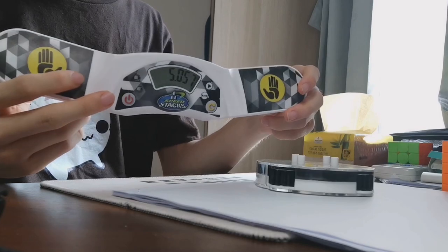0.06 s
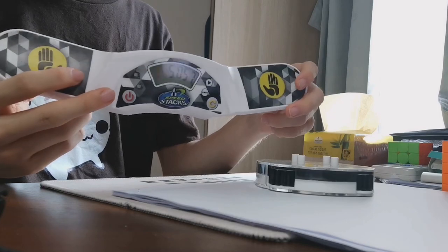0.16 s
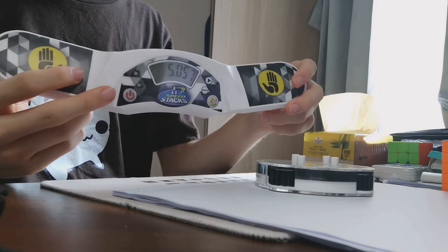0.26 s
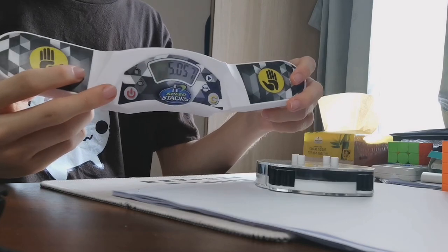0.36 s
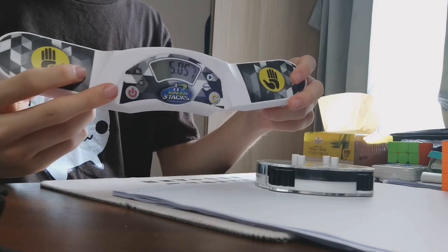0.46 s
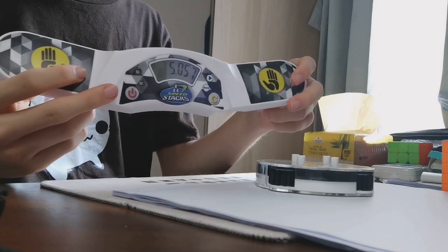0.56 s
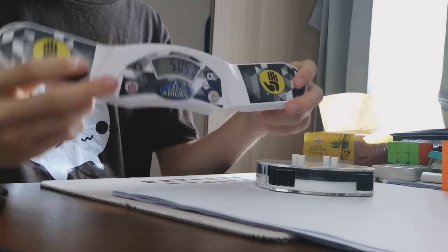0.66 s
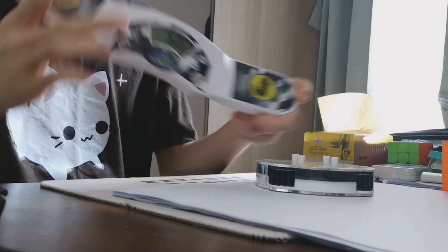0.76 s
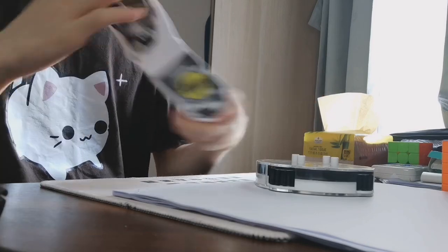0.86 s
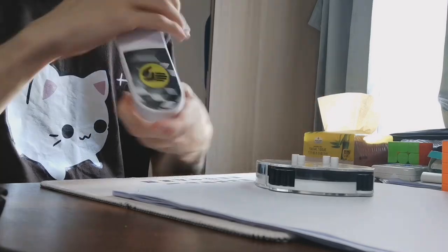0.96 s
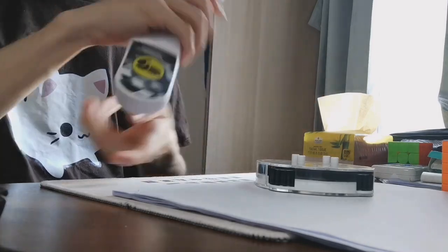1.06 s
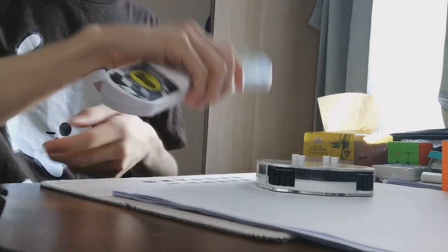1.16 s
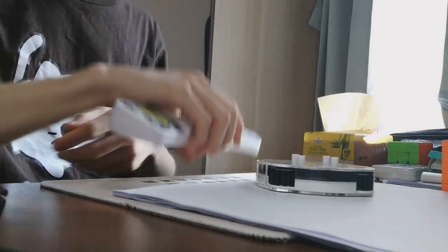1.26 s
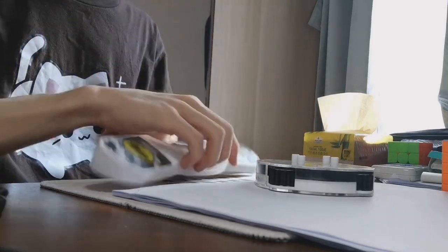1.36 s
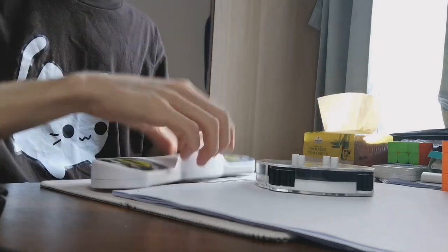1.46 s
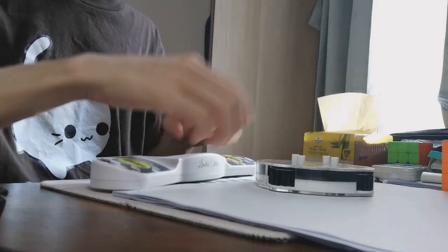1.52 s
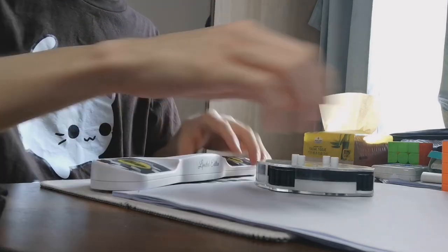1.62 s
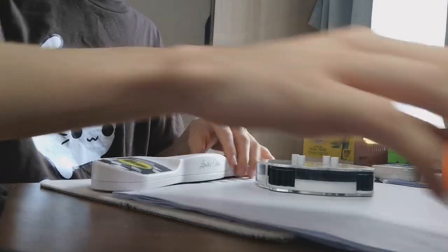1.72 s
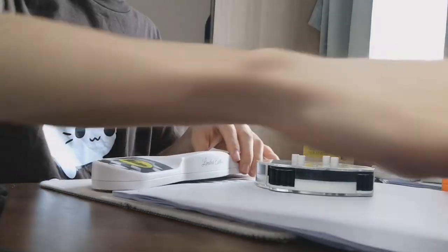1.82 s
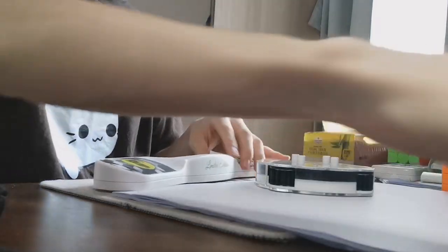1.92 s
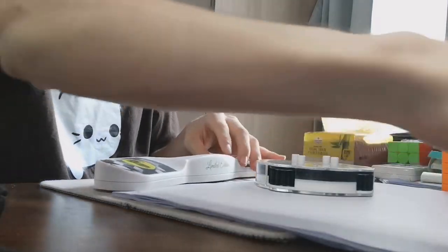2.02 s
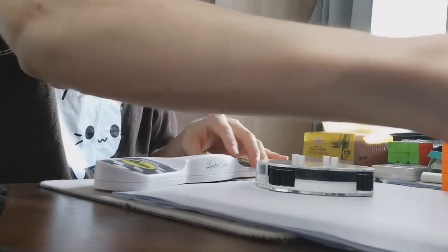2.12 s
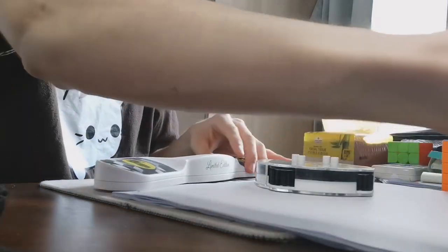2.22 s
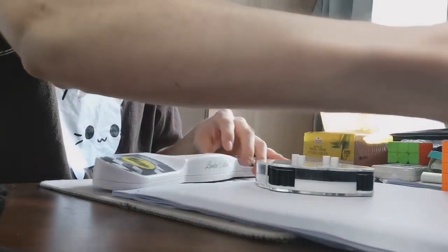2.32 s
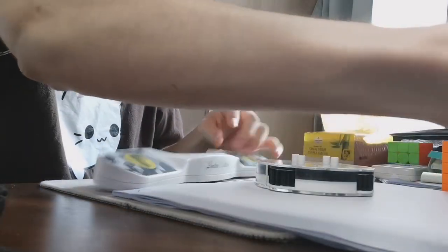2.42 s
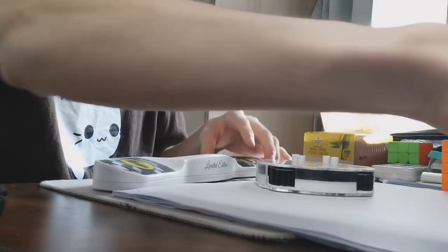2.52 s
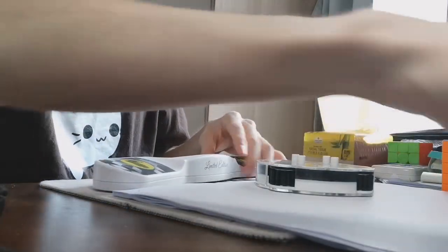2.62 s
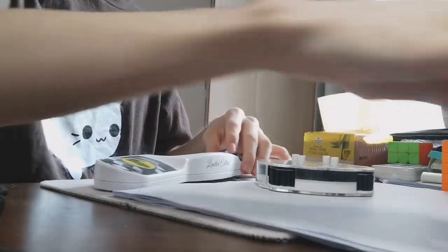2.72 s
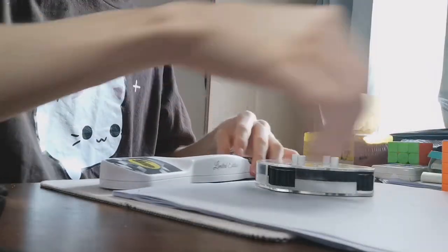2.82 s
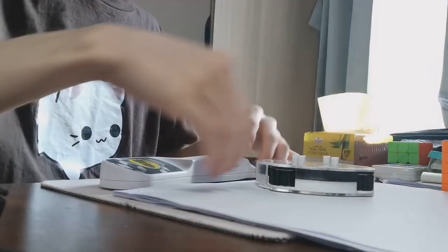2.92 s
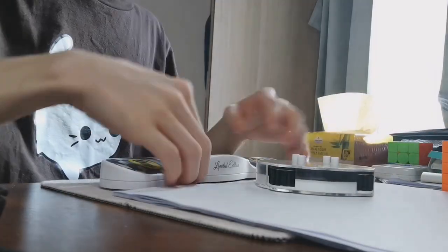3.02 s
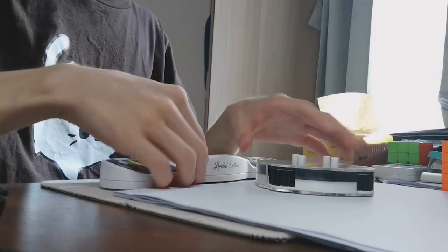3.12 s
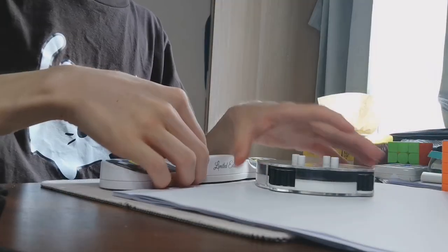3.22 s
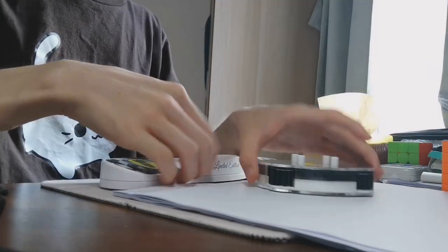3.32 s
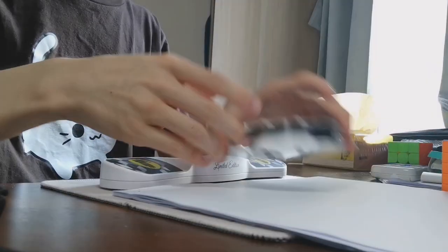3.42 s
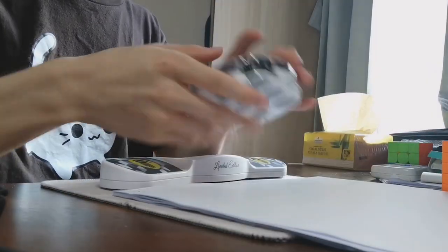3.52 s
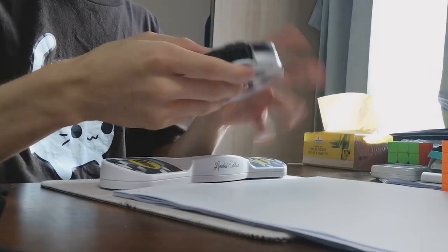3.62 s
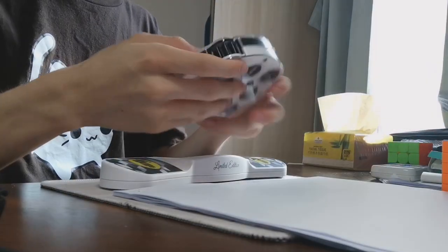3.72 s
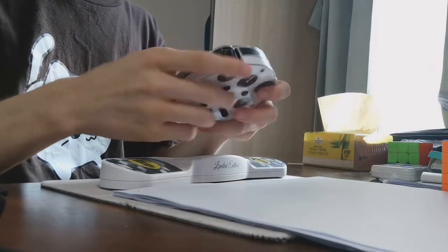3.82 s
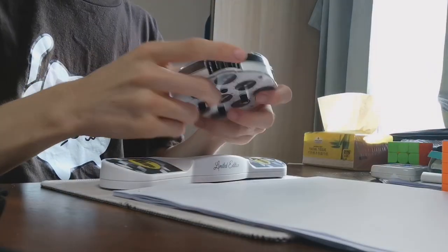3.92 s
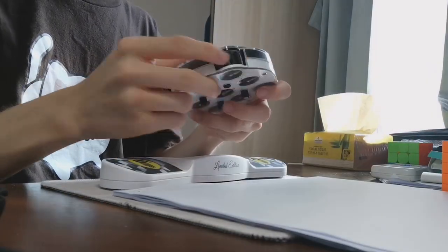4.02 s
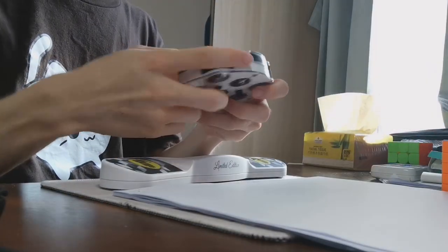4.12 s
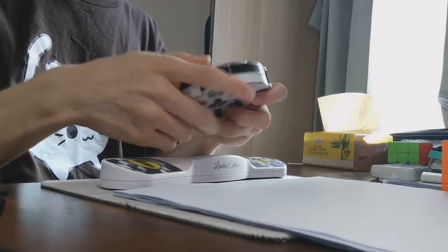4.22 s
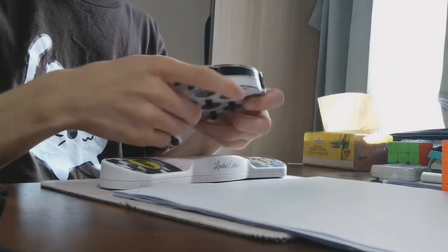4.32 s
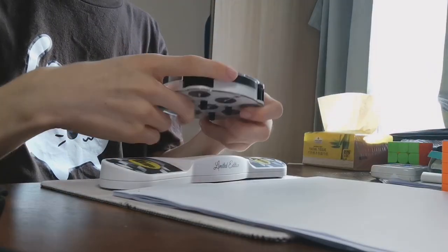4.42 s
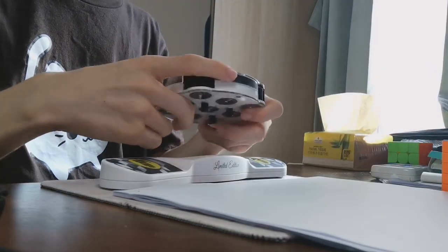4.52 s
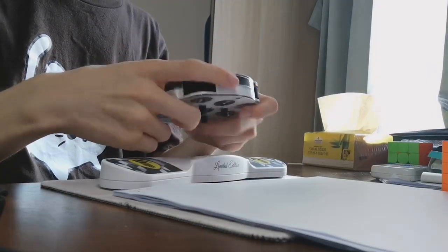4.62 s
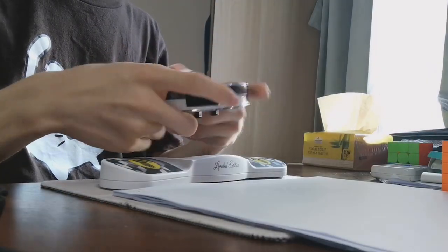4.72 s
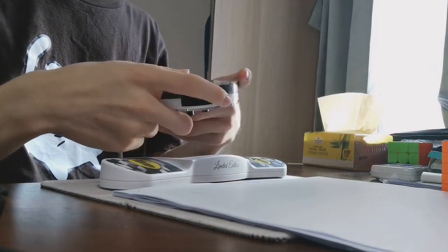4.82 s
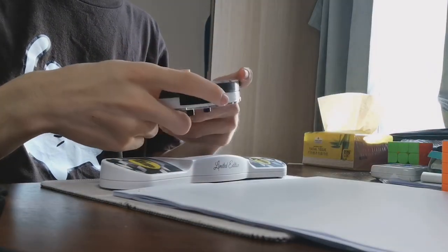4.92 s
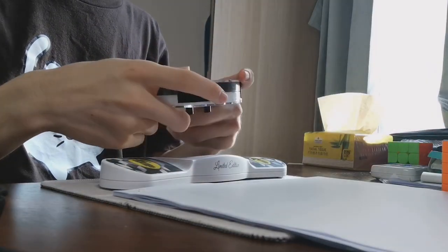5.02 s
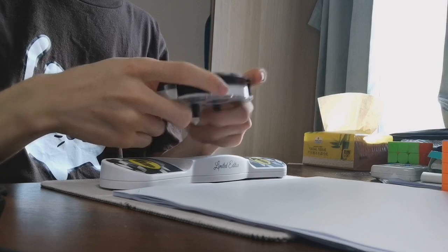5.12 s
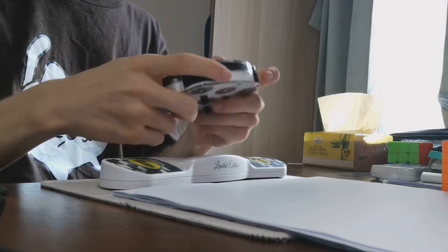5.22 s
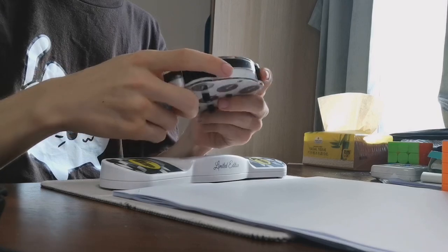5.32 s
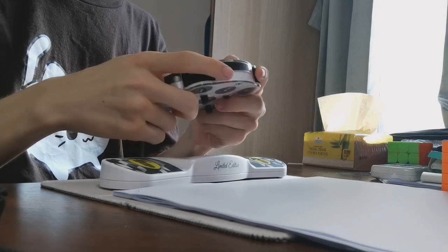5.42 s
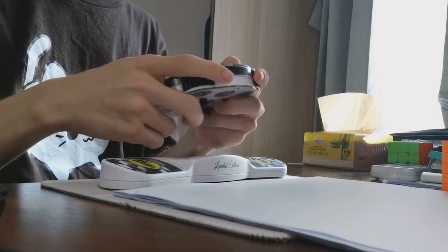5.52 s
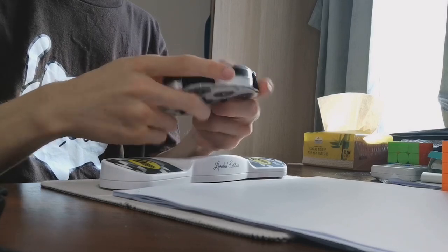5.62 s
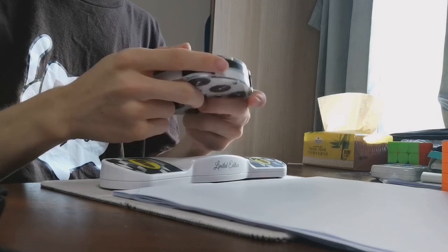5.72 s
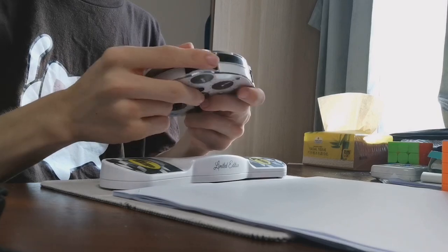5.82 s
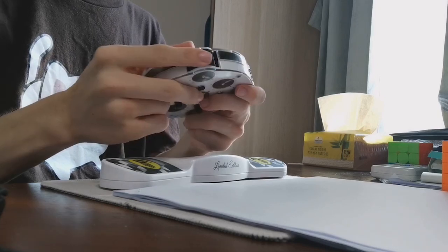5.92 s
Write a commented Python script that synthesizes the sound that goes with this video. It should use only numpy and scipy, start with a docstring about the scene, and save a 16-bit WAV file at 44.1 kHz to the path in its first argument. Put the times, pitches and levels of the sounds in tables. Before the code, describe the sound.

In a quiet small room, a plastic timer clatters onto a wooden desk, a knock thumps nearby, then a twisting puzzle clicks and ratchets rapidly.

```python
"""Low air hum of a small room and a faint whine are heard first and last throughout; skin and sleeve brush past.
A plastic timer is laid on a wooden desk, and a hand knocks on something beside the microphone.
Then a round pin-and-dial puzzle is lifted and worked fast: pins snap, dials ratchet and scrape.
Contacts are swarms of tiny collisions filtered by the body struck, the desk is decaying sines, the air is
shaped noise; a two-port microphone hears them, the snaps, clacks and dials with short room echoes."""
import sys
import numpy as np
from scipy import signal
from scipy.fft import rfft, irfft, next_fast_len
from scipy.io import wavfile
from scipy.ndimage import uniform_filter1d

SR = 44100
rng = np.random.default_rng(int(sys.argv[2]) if len(sys.argv) > 2 else 0)


def wrap_up_sound(samples):
    """Save the sound to the file named by the first command line argument, as 16-bit audio."""
    columns = np.atleast_2d(samples).T
    # keep every value between -1 and 1, then stretch to whole-number steps
    tamed = np.clip(columns, -1, 1)
    steps = np.round(tamed * 32767).astype(np.int16)
    wavfile.write(sys.argv[1], SR, steps)


N = 262836  # length in samples


def gain_of(db):
    """Decibels to a gain."""
    return 10 ** (np.asarray(db) / 20)


def evened(x):
    """Scales to an rms of 1."""
    return x / np.sqrt(np.mean(x ** 2) + 1e-20)


def read(points, hz):
    """Reads a (f/Hz, value) table on a log-frequency axis."""
    f, value = np.transpose(points)
    return np.interp(np.log(hz + 1), np.log(f + 1), value)


def add(mix, s, sound, pan_db):
    """Mixes a sound into both channels at s seconds, pan_db louder on the left."""
    part = mix[:, round(s * SR):][:, :sound.shape[-1]]
    part += gain_of([[pan_db / 2], [-pan_db / 2]]) * sound[..., :part.shape[1]]


def colour(x, db_at):
    """Causal minimum-phase filter with the gain curve db_at(Hz)."""
    gain = gain_of(db_at(abs(np.fft.fftfreq(4096, 1 / SR))))
    log_gain = np.log(np.maximum(gain, 1e-5))
    spectrum = np.exp(np.conj(signal.hilbert(log_gain)))
    taps = np.fft.ifft(spectrum).real[:2048]
    return signal.oaconvolve(x, taps[None], axes=1)[:, :x.shape[1]]


def modes_db(modes, hz):
    """Summed power, in dB, of (f/Hz, width/Hz, level/dB) resonances."""
    return 10 * np.log10(sum(gain_of(2 * db) / (1 + (2 * (hz - f) / w) ** 2) for f, w, db in modes))


def impacts(size, per_s, spread_db):
    """Tiny collisions of uneven strength and random sign at random moments."""
    chance, strength, sign = rng.random((size, 3)).T
    excess = np.minimum(-np.log(1 - strength), 3.5)  # mostly weak, a few strong
    return (chance < per_s / SR) * gain_of(spread_db * excess) * np.sign(sign - .5)


def pair(size, per_s, spread_db, unlike):
    """Collisions as the two ports hear them: the body radiates a little differently to each."""
    a, b = impacts(size, per_s, spread_db), impacts(size, per_s, spread_db)
    return evened(np.array([a + unlike * b, a - unlike * b]))


STROKE_RANGE_DB = 20  # a stroke changes by this much over its swell or fade time


def level(strokes):
    """Gain over time: each stroke swells to its peak and fades, both straight in dB."""
    t = np.arange(N) / SR
    gain = sum(gain_of(db - STROKE_RANGE_DB * np.maximum((s - t) / swell, (t - s) / fade))
               for s, db, swell, fade in strokes)
    return uniform_filter1d(gain, size=300)


# spectrum of the room air: f/Hz, relative level per Hz/dB
AIR_SPECTRUM = [(150, -14.5), (250, -8), (304, -33), (340, -25), (375, -7.5), (571, -2), (816, -7.5),
                (959, -5.5), (1990, -25.5), (2700, -22.5), (2840, -24.5), (3800, -33.5), (6000, -31.5),
                (6700, -22.5), (7500, -32.5), (8680, -53), (12000, -43), (15600, -87), (22000, -120)]
# low resonances of the room: f/Hz, width/Hz, relative total level/dB
ROOM_RESONANCES = [(54.4, 9.5, -56.5), (116, 8.6, -58.5), (165.7, 8.2, -58), (209.1, 7.6, -60.5)]
# how alike the air noise is at both ports: f/Hz, likeness/0 to 1
AIR_LIKENESS = [(60, 0.9), (180, 0.78), (550, 0.77), (1650, 0.011), (4970, 0.16), (15000, 0.33)]
# phase by which the left port leads in the air noise: f/Hz, lead/rad
AIR_PHASE_LEAD = [(0, 3), (1210, -1.5), (2670, 0.5), (6370, -18), (6800, -35.5), (16000, -7)]
# balance of the air noise: f/Hz, left-right/dB
AIR_BALANCE = [(60, -1), (180, 1.5), (550, 2), (1650, 1), (4970, 2), (15000, 3)]
AIR_DB, HUM_DB = -64.5, -50.5  # rms levels of the wide noise and of the resonances


def air():
    """Steady room noise, heaped up on the room's low resonances, only partly alike at the two ports."""
    frame, hop = 4096, 1024
    hz = np.fft.rfftfreq(frame, 1 / SR)
    a, b, c, d = rng.standard_normal((N // hop + 5, len(hz), 4)).T
    same = read(AIR_LIKENESS, hz)[:, None]
    left = a + 1j * b
    right = same * left + np.sqrt(1 - same ** 2) * (c + 1j * d)
    right = right * np.exp(-1j * read(AIR_PHASE_LEAD, hz))[:, None]
    side_db = read(AIR_BALANCE, hz)[:, None] / 2
    noise = np.array([left * gain_of(side_db), right * gain_of(-side_db)])

    def shaped(db):
        sound = signal.istft(noise * gain_of(db)[:, None], nperseg=frame, noverlap=frame - hop)[1]
        return evened(sound[:, :N])
    # a wider resonance spreads its power thinner
    resonances = [(f, w, db - 10 * np.log10(w)) for f, w, db in ROOM_RESONANCES]
    wide, hum = shaped(read(AIR_SPECTRUM, hz)), shaped(modes_db(resonances, hz))
    return gain_of(AIR_DB) * wide + gain_of(HUM_DB) * hum


WHINE_HZ, WHINE_DB = 2607, -82  # mean pitch and level


def whine():
    """A faint steady sine that wavers a little in pitch and level, stronger on the left."""
    pitch_drift, level_drift = evened(uniform_filter1d(rng.standard_normal((2, N)), size=3000))
    tone = np.sin(2 * np.pi * np.cumsum(WHINE_HZ + 7.7 * pitch_drift) / SR)
    return gain_of(WHINE_DB + 0.5 * level_drift) * np.sqrt(2) * tone * np.array([[1.2], [.8]])


# skin and sleeve brushing past: t/s, peak level/dB, swell/s, fade/s
RUSTLE_STROKES = [(.718, -74, .02, .015), (.92, -77.5, .15, .05), (1.078, -69.5, .17, 0.29),
                  (1.5, -71.5, 0.05, 0.068), (1.876, -70.5, 0.024, 0.17), (1.968, -64, 0.0089, 0.23),
                  (2.414, -81, 0.14, 0.11), (2.55, -65, 0.096, 0.11), (3.05, -76.5, 0.73, .15),
                  (3.204, -68.5, 0.037, 0.15)]
# colour of the friction: f/Hz, relative level per Hz/dB
FRICTION_SPECTRUM = [(880, -43), (1500, -7), (1640, -9.5), (2700, 0.5), (3470, -3), (8790, -10.5),
                     (10700, -10.5), (13000, -24), (16300, -45)]


def rustle():
    """Fine crackly friction: dense, very uneven collisions that swell and fade with each stroke."""
    crackle = pair(N, 9000, 3.4, 0.49)
    return evened(colour(crackle, lambda hz: read(FRICTION_SPECTRUM, hz))) * level(RUSTLE_STROKES)


RATTLE_PER_BUILD_UP = 0.73  # a slower blow also rattles longer
STRIKE_FADES_MS = 3  # the main strike is less distinct the longer the build-up, on this scale


def rattles(rows, body_db, usual_share_db, per_s, rattle_ms):
    """Each blow is a swarm of collisions that builds up, peaks, and dies after the rattle time.
    Returns the direct sound and the smoother average over all directions that reaches the walls."""
    out, away = np.zeros((2, N)), np.zeros((2, N))
    t = np.arange(4096) * 1000 / SR  # ms
    spots = 2 * np.pi * rng.random((len(rows), 2))
    for (s, db, share_db, ring_hz, rise_ms, pan_db), spot in zip(rows, spots):
        def mean_db(hz):
            tilt = 0.45 * (share_db - usual_share_db)  # dB per octave
            return body_db(hz) + tilt * np.log2(np.maximum(hz, 800) / 3000)

        def blow_db(hz):
            octave = np.log2(hz + 1)
            # every spot struck favours other modes
            where = sum(1.8 * np.cos(k * octave + phase) for k, phase in zip((4., 11.), spot))
            ring = 8.9 / (1 + ((hz - ring_hz) / (0.06 * ring_hz)) ** 2)
            return mean_db(hz) + where + ring

        decay_ms = rattle_ms + RATTLE_PER_BUILD_UP * rise_ms
        after = np.maximum(t - rise_ms, 0)
        shape = np.minimum(t / rise_ms, 1) ** 1.1 * np.exp(-(after / decay_ms) ** 1.01)
        # the main strike stands out of the swarm
        shape *= 1 + 0.68 * np.exp(-rise_ms / STRIKE_FADES_MS - abs(t - rise_ms) / 0.13)
        sound = colour(pair(len(t), per_s, 1.66, 0.44) * shape, blow_db)
        loudest = np.sqrt(uniform_filter1d(sound.mean(0) ** 2, size=130).max())  # over 3 ms
        sound *= gain_of(db) / loudest
        add(out, s, sound, pan_db)

        click = signal.unit_impulse((1, len(t)))
        pulse = colour(click, lambda hz: .6 * mean_db(hz) + .4 * blow_db(hz))
        pulse *= np.linalg.norm(sound.mean(0)) / np.linalg.norm(pulse)
        add(away, s + rise_ms / 1000, pulse, 0)
    return out, away


# plastic clacks and small ticks on the desk, and hand knocks near the microphone around 2.64 s:
# t/s, level of the loudest 3 ms/dB, treble share/dB, strongest ring f/Hz, build-up/ms, left-right/dB
CLACK_AND_KNOCK_BLOWS = [(1.083, -68, 5, 2830, 1.8, 4), (1.518, -49.5, -17.5, 3080, .37, 6),
                         (1.542, -41, -21.5, 1100, .17, 3), (1.549, -39, -18.5, 2680, 2.46, 7.5),
                         (1.603, -47.5, -25, 1050, .46, 3), (1.62, -54, -10, 2500, 8, -2.1),
                         (1.647, -34, -24, 1210, .54, 0.5), (1.66, -44.5, -12, 1280, 2.5, 4),
                         (1.71, -42.5, -30, 1210, 1.1, 4), (1.762, -58, -14.5, 2600, 1.2, 3),
                         (1.966, -57, -21, 850, 3.4, -3), (2.04, -60.5, -17, 4220, 1.8, -3),
                         (2.106, -65, -5, 1230, 1.7, -1), (2.415, -64, -3, 2040, .68, -12),
                         (2.643, -38.5, -24.5, 1070, .79, 0), (2.677, -49.5, 2, 10970, .18, -6),
                         (2.694, -47, -28, 1020, .93, -2), (2.762, -62, 9, 10400, .45, 2),
                         (3.174, -67, -5, 4240, 1.1, -2.1)]
# shared colour of the clacks and knocks: f/Hz, relative level per Hz/dB
CLACK_AND_KNOCK_SPECTRUM = [(240, -17.5), (400, -9), (954, -14.5), (1280, -11.5), (1670, -16),
                            (2920, -12.5), (3400, -16.5), (10900, -30), (16300, -52.5)]


def clacks_and_knocks():
    """Clacks and ticks on the desk and hand knocks near the microphone, each a short swarm of collisions."""
    def body_db(hz):
        return read(CLACK_AND_KNOCK_SPECTRUM, hz)
    return rattles(CLACK_AND_KNOCK_BLOWS, body_db, -13, 10000, rattle_ms=9.9)


# low thumps of the timer on the desk and of the hand knocks around 2.64 s:
# t/s, strength/dB, contact time/ms, left-right before halving/dB
THUMP_BLOWS = [(1.515, -30, 5.6, 6), (1.539, -22, 3.8, 8), (1.602, -22, 4.8, 3), (1.646, -18.5, 1.4, 0.5),
               (1.709, -23, 1.8, -2.5), (1.744, -26.5, 3.3, -15), (2.057, -37, 3.2, -3),
               (2.537, -34, 6.5, -5), (2.643, -16.5, 1.4, 3), (2.7, -24, 2.4, -10), (2.758, -31.5, 2.9, -6),
               (3.017, -42.5, 2.7, -4), (3.47, -39.5, 3.7, -8)]
# low modes of the desk top: f/Hz, level/dB, t60/s, left-right/dB
DESK_MODES = [(31.7, -16, 0.94, -1), (56.2, -5, 0.19, 6), (82.3, 5.5, 0.19, 0.5), (119, -10, 0.45, 6.5),
              (163.9, -6.5, 0.35, 1), (194.2, -12.5, 0.17, 20), (253.4, -5.5, 0.11, 8),
              (358, -21, 0.14, -6), (394.4, -18, 0.12, -8), (506, -18, 0.092, 12)]


def desk():
    """Soft pushes ring the low modes of the desk top; the bass swells for a cycle, a longer contact is duller."""
    out, t = np.zeros((2, N)), np.arange(SR // 2) / SR
    spots = rng.standard_normal((len(THUMP_BLOWS), len(DESK_MODES)))  # dB, each blow favours other modes
    for (s, db, contact_ms, pan_db), spot in zip(THUMP_BLOWS, spots):
        ring = 0
        for k, ((hz, mode_db, t60, side_db), spot_db) in enumerate(zip(DESK_MODES, spot)):
            dull_db = 8.7 * (hz * contact_ms / 1000) ** 2
            sides_db = np.array([[side_db / 2], [-side_db / 2]])
            gain = gain_of(mode_db + spot_db - dull_db - 60 * t / t60 + sides_db)
            swell = 1 - np.exp(-t * hz)
            ring = ring + gain * np.sin(2 * np.pi * hz * t) * swell * (-1) ** (k + 1)
        add(out, s, gain_of(db) * ring, pan_db / 2)
    return out


# main modes of the hollow case: f/Hz, width/Hz, level/dB
CASE_MODES = [(1320, 180, 2), (1870, 68, 1), (2550, 300, -2.5), (4340, 1130, -1), (6860, 380, -9),
              (10170, 990, -18)]
# dense small modes of pins and gears: f/Hz, relative level per Hz/dB
SMALL_MODES = [(290, -51), (500, -16), (1130, 4), (1610, -16), (1940, 0), (4660, -9), (6230, -11),
               (6700, -5), (8340, -11.5), (11000, -10), (16300, -35)]


def shell_db(hz):
    """The puzzle's case rings over a bed of dense small modes."""
    no_bass_db = -10 * np.log10(1 + (700 / (hz + 1)) ** 4)  # a small case radiates no bass
    case = gain_of(2 * (modes_db(CASE_MODES, hz) + no_bass_db))
    return 10 * np.log10(case + gain_of(2 * (read(SMALL_MODES, hz) - 1)))


# the puzzle's snaps, with slower ratchet and scrape strokes among them:
# t/s, level of the loudest 3 ms/dB, treble share/dB, strongest ring f/Hz, build-up/ms, left-right/dB
SNAP_AND_RATCHET_BLOWS = [(3.357, -37, -1, 1340, 0.37, 2), (3.473, -40, -7, 1430, 0.28, -2.5),
                          (3.7, -45, -27, 1250, 3.6, -1), (3.721, -41.5, -15, 1230, 1.6, 2),
                          (3.732, -39.5, -12.5, 2400, 2.05, -2), (3.795, -51, -37, 890, 1.7, 0),
                          (3.855, -57, -31, 1950, 0.94, 0), (3.898, -45.5, -29.5, 2020, 1.8, 0),
                          (3.929, -27.5, -6.5, 1146, 0.24, -4.5), (4.009, -26.5, -11, 1150, .88, -1.5),
                          (4.08, -28, -6.5, 5700, 0.47, -1), (4.185, -38.5, -7.5, 2400, 0.44, -1),
                          (4.212, -34.5, -8, 1930, 14.5, 0), (4.235, -34, -7.5, 2350, 8.2, 6),
                          (4.247, -36, -13, 1150, 0.66, -8), (4.261, -30.5, -7, 4460, 3.9, 0),
                          (4.27, -38, -22, 1080, 2.9, -3), (4.284, -34.5, -7.5, 1100, 6.7, 3),
                          (4.297, -52, -11, 1910, 2.8, 6), (4.416, -38, -18, 1270, 1, -2),
                          (4.426, -26.5, -3.5, 1170, 0.27, 2), (4.471, -30, -5.5, 1860, 0.47, -2.1),
                          (4.522, -47, -18, 1840, 6.9, 1), (4.599, -48, -20.5, 2040, 1.03, -2),
                          (4.62, -41, -14, 1110, 0.58, -9), (4.629, -31, -11, 2170, 0.25, 1.5),
                          (4.761, -41.5, -15, 1070, 1.17, 2.5), (4.821, -42.5, -11, 2400, 0.24, 0),
                          (4.831, -45, -19, 1950, 0.81, 0), (4.842, -28.5, -5.5, 990, 0.38, 4.5),
                          (4.852, -27.5, -8, 4860, 0.49, 0), (4.981, -41.5, -9, 2520, 1.8, 6),
                          (5.006, -33.5, -9, 1800, 7.4, 0.5), (5.073, -49.5, -16, 1100, 1.9, 3),
                          (5.083, -34, -10, 1310, 5.9, 2), (5.213, -50.5, -16, 1130, 1.3, 5),
                          (5.263, -48.5, -17, 1110, 6, 1), (5.272, -38.5, -17, 2040, 0.64, 5),
                          (5.283, -29.5, -4.5, 1194, 0.42, 1.5), (5.317, -31.5, -3.5, 4160, 0.39, -9),
                          (5.419, -50, -7, 4040, 2, 2), (5.457, -46, -10.5, 1330, 0.87, 2),
                          (5.501, -31, -10, 1340, 4.2, 2), (5.56, -30, -8, 2400, 2.45, 0),
                          (5.643, -52, -17, 1900, 1.1, 0), (5.651, -35.5, -10, 2200, 7, -1),
                          (5.808, -48, -20, 1080, 0.96, 11), (5.82, -28.5, -2.5, 3200, 0.5, -2),
                          (5.949, -49.5, -12, 2280, 5.7, 3)]


def snaps_and_ratchets():
    """Snaps and slower ratchet and scrape strokes ring the hollow case, each a short swarm of collisions."""
    return rattles(SNAP_AND_RATCHET_BLOWS, shell_db, -9, 12000, rattle_ms=4.6)


LIFT_S, LOOSE_PER_S, LOOSE_DB = 3.68, 60, -65.5  # lift time, mean ticks per second, rms over the whole scene


def loose():
    """Stray dull ticks of pins shifting in their seats once lifted, each a few quick contacts."""
    ticks = impacts(N, LOOSE_PER_S, 7.6) * (np.arange(N) > LIFT_S * SR)
    t = np.arange(600) / SR
    burst = np.exp(-t / 0.0036) * np.minimum(t / 0.00071, 1)
    bursts = signal.oaconvolve(abs(ticks), burst)[:N]

    def dull_db(hz):
        return shell_db(hz) - 5.6 * np.log2(np.maximum(hz, 800) / 3000)
    return gain_of(LOOSE_DB) * evened(colour(pair(N, 12000, 2.1, 0.98) * bursts, dull_db))


# dials whirring over their teeth: t/s, peak level/dB, swell/s, fade/s
WHIRR_STROKES = [(3.764, -68, 0.62, 0.14), (4.21, -54, .012, 0.09), (4.536, -58.5, .075, 0.47),
                 (5.1, -69, .012, .19), (5.4, -79, .2, .3), (5.51, -42.5, 0.018, 0.051)]


def whirr():
    """Gear teeth chatter in uneven clumps through the case."""
    clumps = gain_of(2.5 * evened(uniform_filter1d(rng.standard_normal(N), size=200)))
    teeth = pair(N, 12000, 2.0, .4) * clumps
    return evened(colour(teeth, shell_db)) * level(WHIRR_STROKES)


# how fast the small room dies away: f/Hz, t60/s
ROOM_DECAY = [(100, 0.61), (1000, 0.16), (4000, 0.25), (12000, 0.25)]


def room(x):
    """Sparse echoes of random sign, each band dying at its own speed, other echoes at each port."""
    size = SR // 2
    taps = np.zeros((2, size))
    at = np.arange(120, size - 10, 10) + rng.integers(0, 10, (2, (size - 121) // 10))
    np.put_along_axis(taps, at, rng.choice([-1., 1.], at.shape), 1)
    hz, t, z = signal.stft(taps, SR, nperseg=256)
    decay = gain_of(-60 * t / read(ROOM_DECAY, hz)[:, None])
    tail = signal.istft(z * decay, SR, nperseg=256)[1]
    return signal.fftconvolve(x.mean(0)[None], tail / np.linalg.norm(tail[0]), axes=1)[:, :N]


# colour gap of the two microphone ports: f/Hz, left-right/dB
PORT_COLOUR = [(300, 1.5), (1000, -0.6), (3000, 2), (6500, 1.5), (8500, 3.5), (11000, -16.5), (16000, -2.5)]
# phase by which the left port leads: f/Hz, lead/rad
PORT_PHASE_LEAD = [(0, 0.14), (1380, -1), (1890, -0.73), (4570, -1.02), (8440, -1.5), (16000, -0.12)]


def ports(x):
    """The microphone ports differ in colour and in the moment a sound reaches them."""
    size = next_fast_len(N)
    hz = np.fft.rfftfreq(size, 1 / SR)
    left = gain_of(read(PORT_COLOUR, hz) / 2) * np.exp(.5j * read(PORT_PHASE_LEAD, hz))
    return irfft(rfft(x, size) * np.array([left, 1 / left]), size)[:, :N]


def scene():
    """Airborne contacts pass the ports, all but the rustle echo; low thumps, air and whine join directly."""
    desk_sound, desk_away = clacks_and_knocks()
    puzzle_sound, puzzle_away = snaps_and_ratchets()
    gears = loose() + whirr()
    echoes = gain_of(-4.5) * room(desk_away + puzzle_away + gears)
    airborne = rustle() + desk_sound + puzzle_sound + gears + echoes
    return air() + whine() + desk() + ports(airborne)


EDGE_HZ = 16300  # upper band limit


def record(dry):
    """The microphone loses the deepest bass; then the band limit of the recorder."""
    thin = signal.sosfilt(signal.butter(2, 42, "high", fs=SR, output="sos"), dry)
    low_pass = signal.firwin(511, EDGE_HZ, window=("kaiser", 9), fs=SR)
    return signal.oaconvolve(thin, low_pass[None], "same")


dry = scene()
out = record(dry)
wrap_up_sound(out)
```